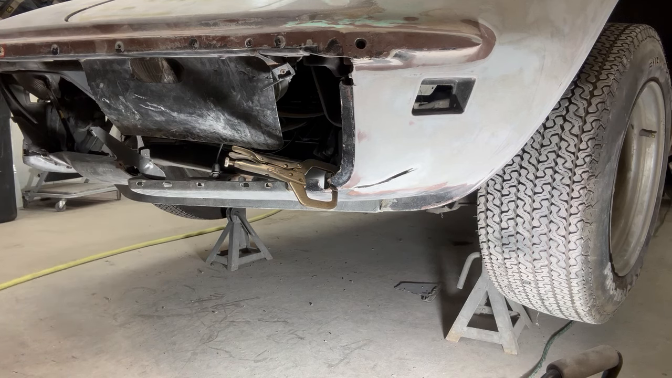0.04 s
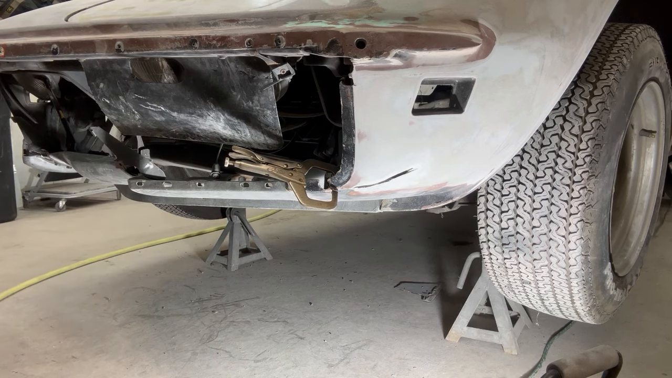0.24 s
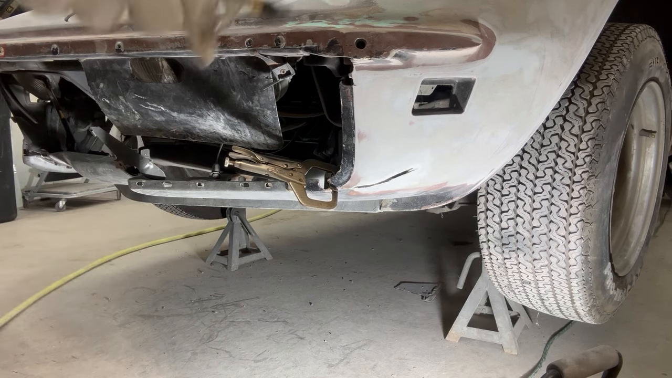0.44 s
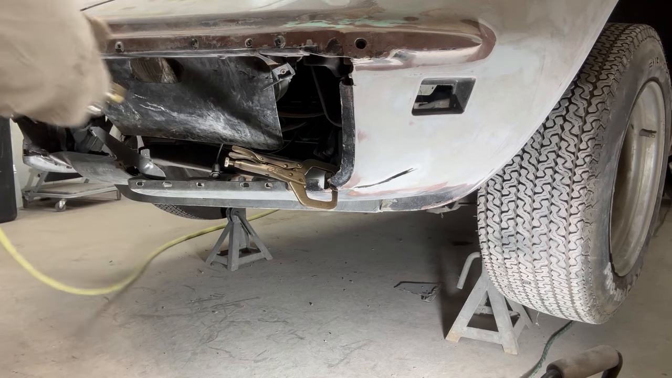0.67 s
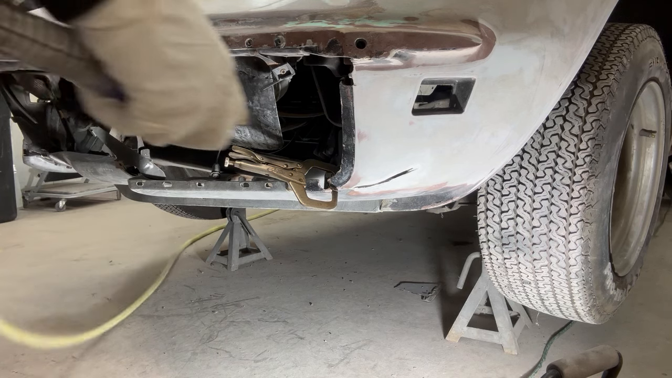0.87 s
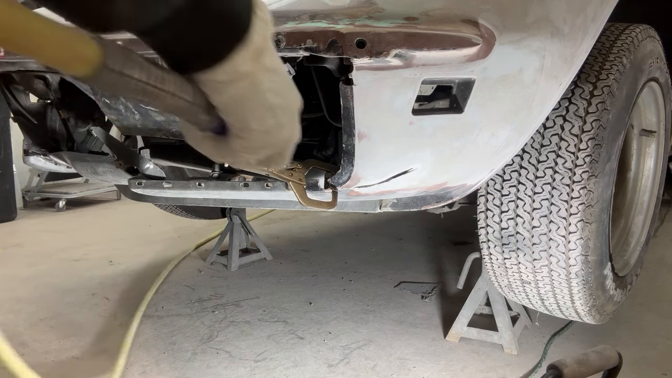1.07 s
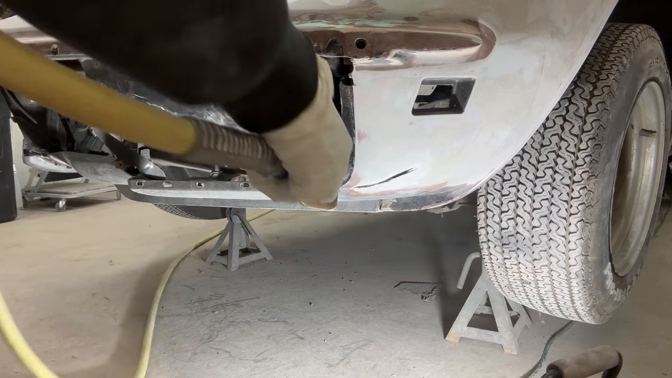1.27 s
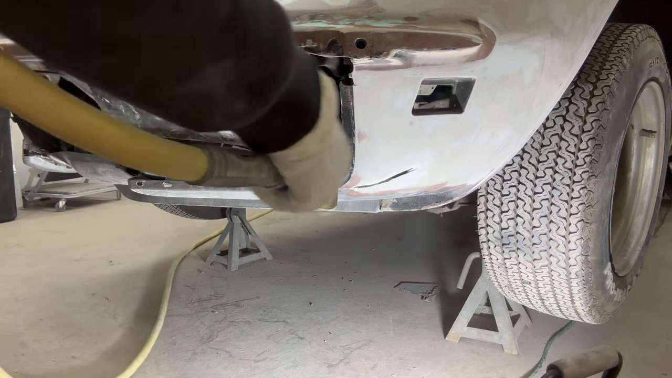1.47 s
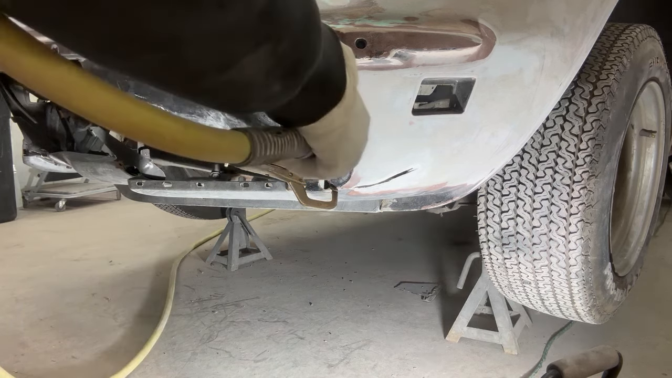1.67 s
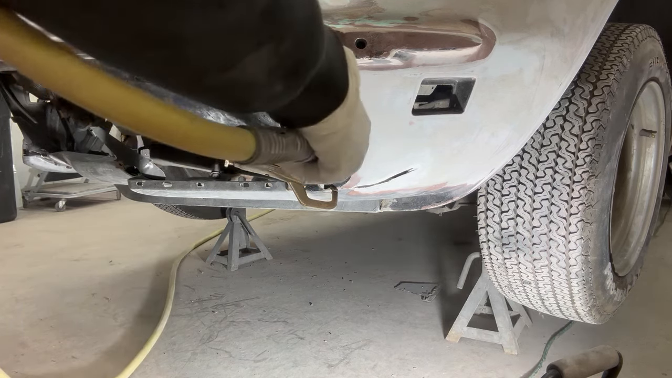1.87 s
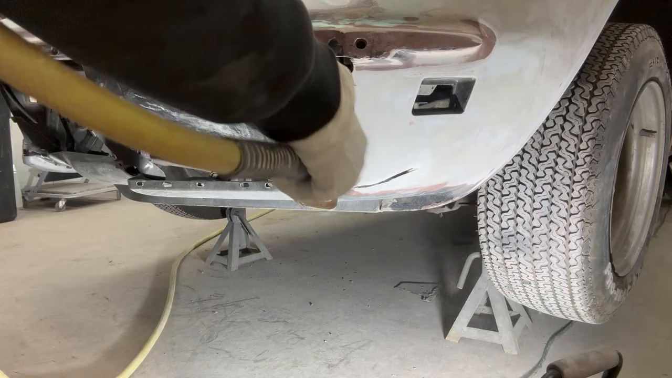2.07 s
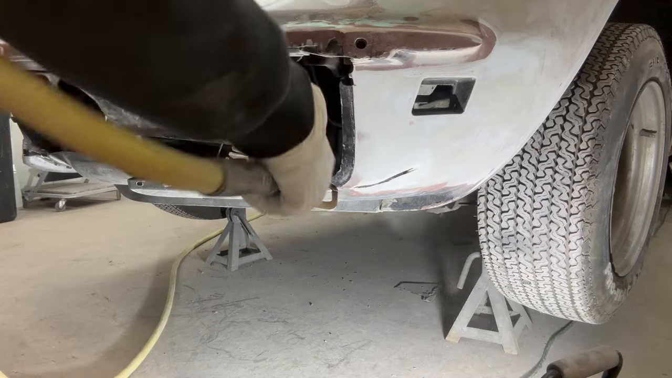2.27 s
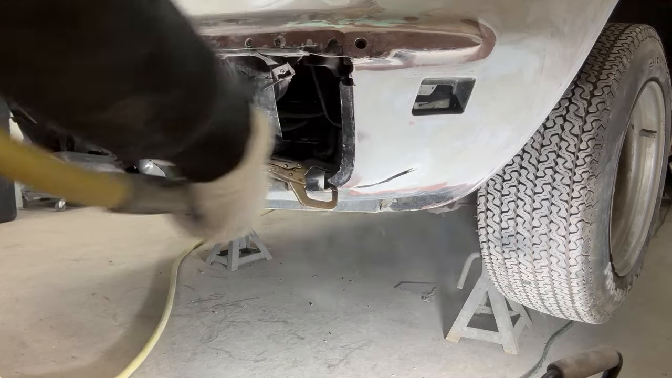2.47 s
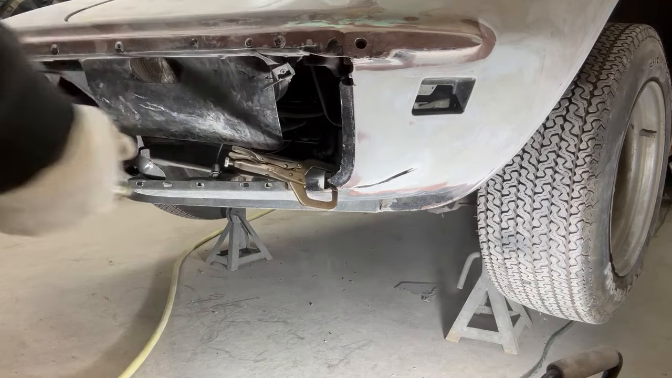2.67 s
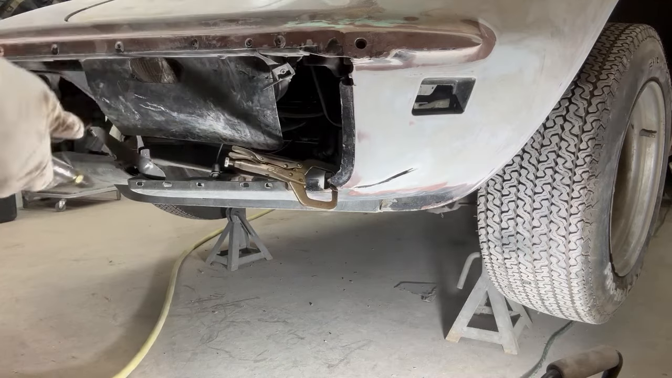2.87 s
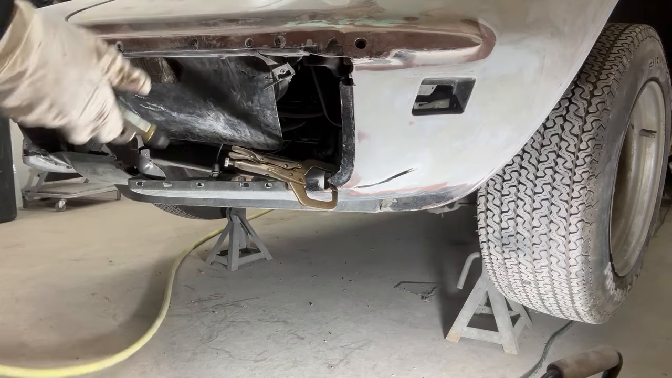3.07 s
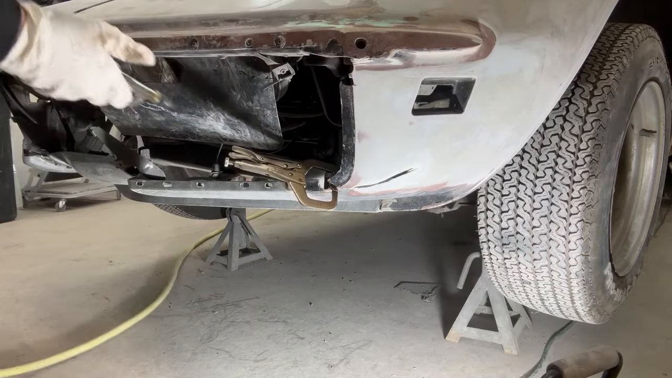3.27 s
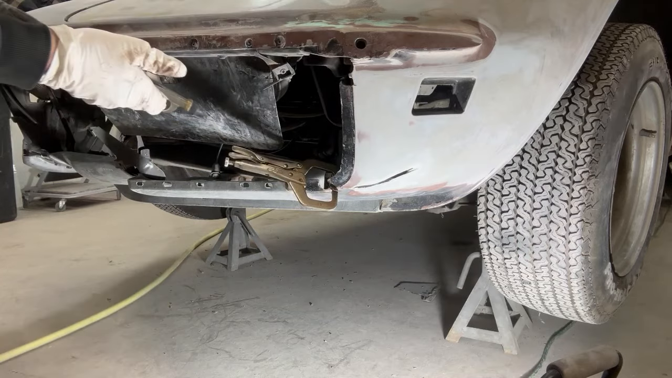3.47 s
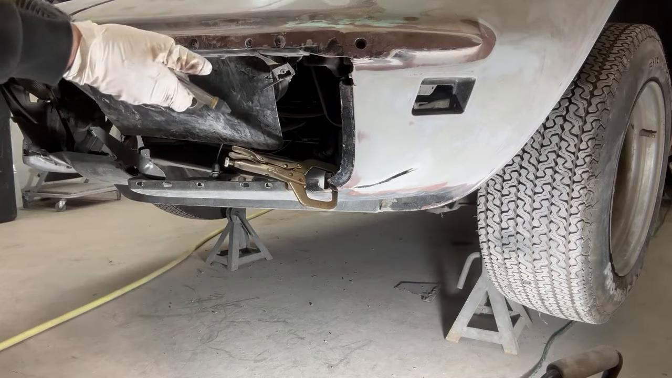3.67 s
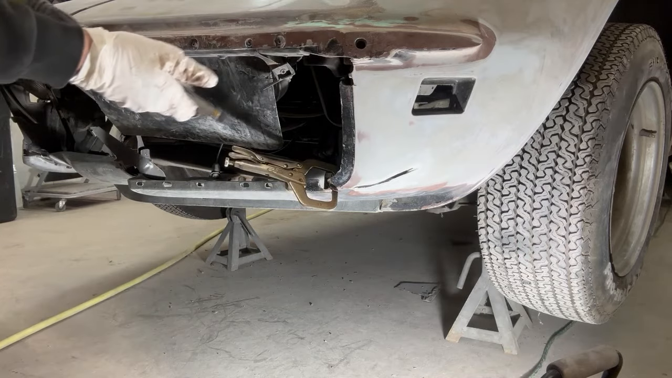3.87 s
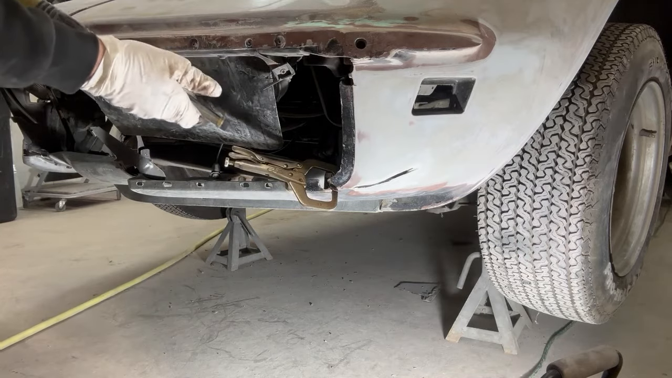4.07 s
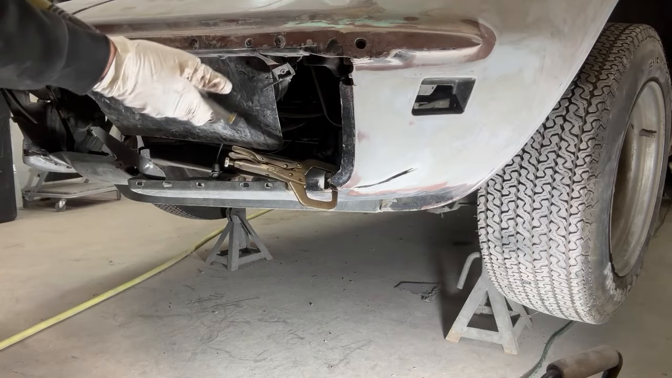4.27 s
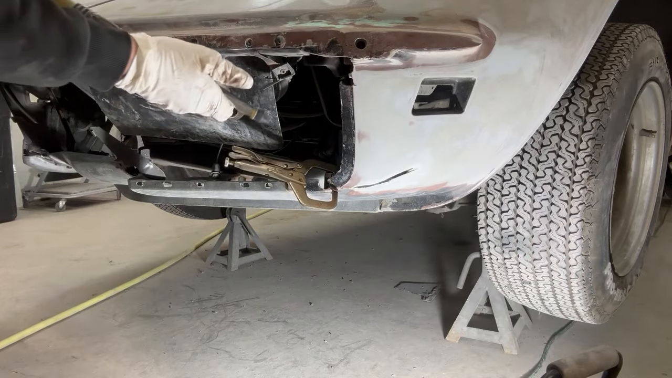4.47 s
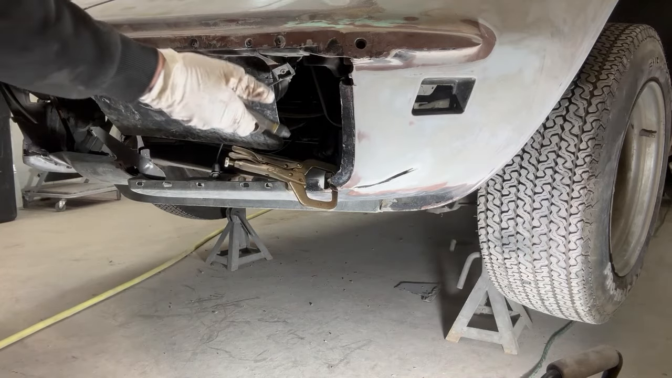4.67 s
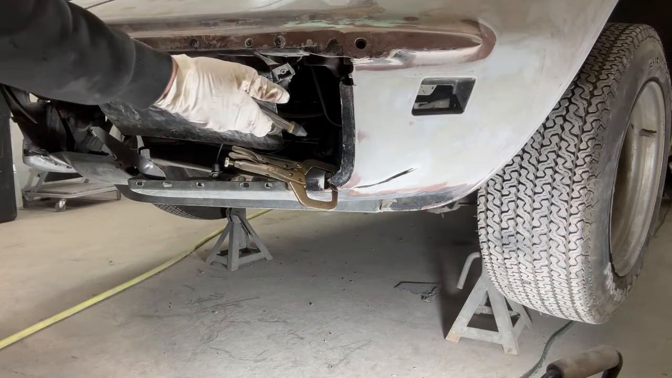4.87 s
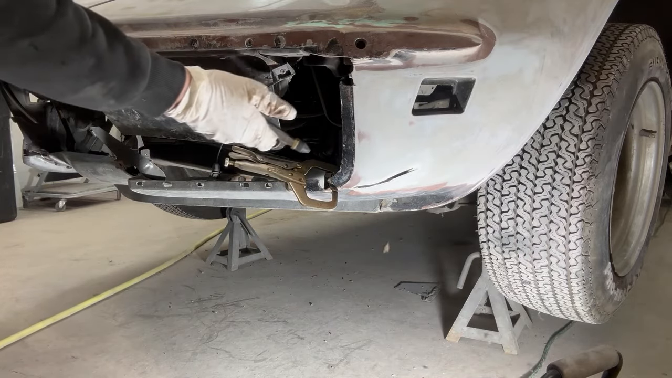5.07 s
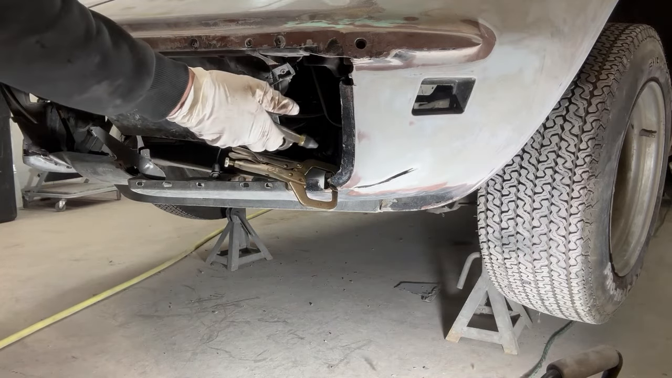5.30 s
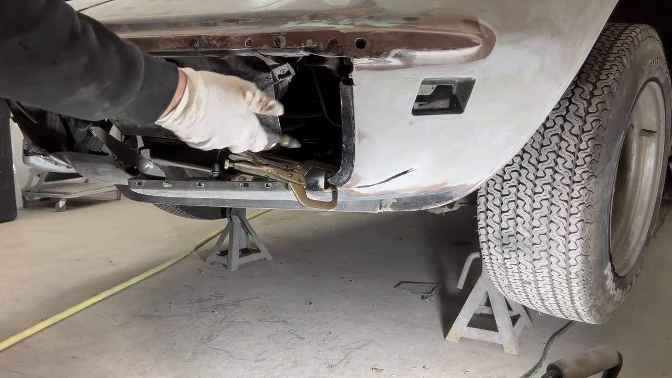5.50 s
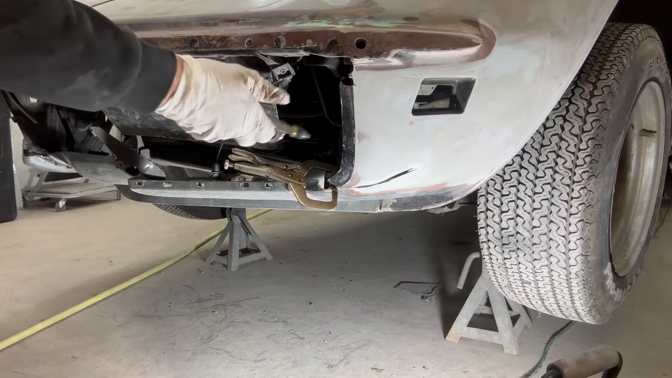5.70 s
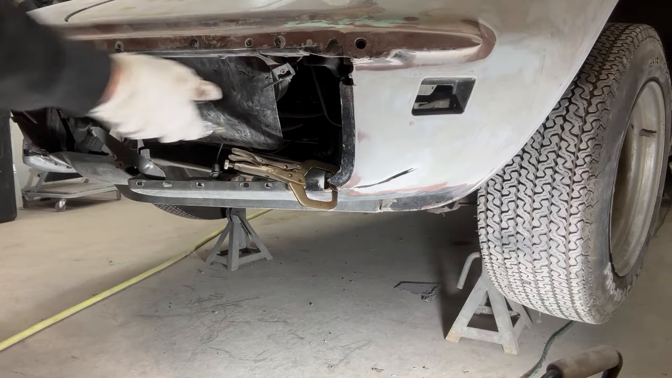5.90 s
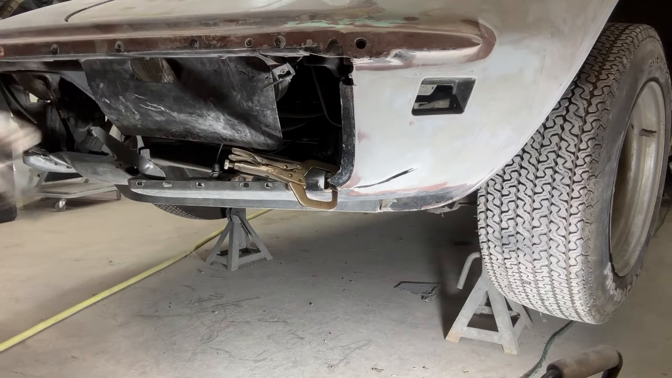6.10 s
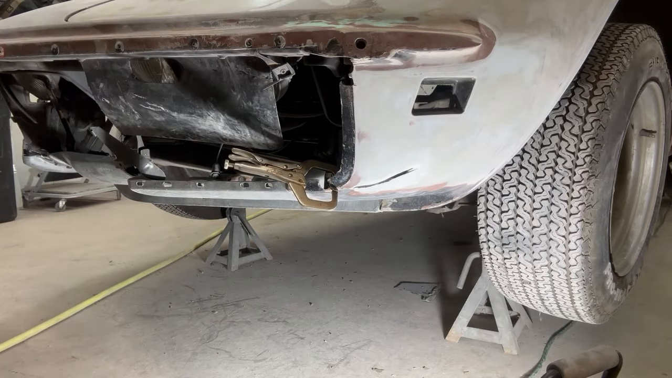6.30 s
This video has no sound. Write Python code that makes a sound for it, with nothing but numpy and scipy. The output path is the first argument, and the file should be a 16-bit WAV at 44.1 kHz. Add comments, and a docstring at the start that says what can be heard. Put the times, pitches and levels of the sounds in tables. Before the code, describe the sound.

At the start a rubber air hose drags with a soft gritty scuff over a concrete floor, then bumps it lightly several times until about 0.8 seconds, while air leaks faintly from a coupling. At 1.1 seconds a blow gun opens abruptly, close to the microphone: a loud, bright hiss with a hollow roar from the metal panels of a car body and a slight low rumble. It shuts off at 2.5 seconds, leaving a short workshop echo. Quiet hose scuffs and a few soft knocks follow from 2.7 to 3.8 seconds, with a very faint seep of air. At 3.9 seconds a second loud blast begins, its roar shifting between deep and metallic as the jet moves. From about 5.3 seconds it flutters in sharp hissing surges across metal edges. It stops at 5.9 seconds and the echo fades into faint room noise.

```python
"""An air blow gun blasts twice into the open nose of a car body in a workshop, close to a phone.
The nozzle hisses; the jet roars in the hollow panels and tears on their edges; the shop rings on.
Before and between the blasts the rubber hose scuffs and knocks on the concrete,
and air leaks faintly at the coupling and past the valve."""
import sys
import numpy as np
from scipy import signal
from scipy.fft import rfft, irfft, next_fast_len
from scipy.io import wavfile
from scipy.ndimage import uniform_filter1d, map_coordinates

SR = 44100
rng = np.random.default_rng(int(sys.argv[2]) if len(sys.argv) > 2 else 0)


def digitize_waveform(pressure):
    """Quantize a signal to 16-bit integers and store it at the path in sys.argv[1].

    Rows of a 2-D input are taken as channels; values are limited to [-1, 1].
    """
    field = np.atleast_2d(pressure).T
    bounded = np.clip(field, -1, 1)
    quanta = np.round(bounded * 32767).astype(np.int16)
    wavfile.write(sys.argv[1], SR, quanta)


N = 279814
TIME = np.arange(N) / SR
FFT_SIZE = next_fast_len(N + SR)
HZ = np.arange(FFT_SIZE // 2 + 1) * SR / FFT_SIZE + 1e-3

# trigger valve, per blast: (open [s], shut [s], rise [s], fall [s])
VALVE = [(1.12, 2.474, .021, .033), (3.889, 5.915, 0.0066, 0.022)]
# jet aim, a curve per blast: (time [s], jet level [dB], deep roar drive [dB], metal roar drive [dB])
JET_AIM = [
    [(1.134, -14, -29, -18), (1.142, -14.5, -10, -7), (1.17, -15.5, -4, -6), (1.5, -16.5, -5.5, -4.5),
     (1.6, -16.5, -8.5, -12), (1.78, -17.5, -6.5, -12.5), (1.86, -18, -3, -11), (2.08, -19.5, -1.5, -3.5),
     (2.27, -19, -9, -10.5), (2.445, -21, -8, -6)],
    [(3.89, -63.5, -25, -19.5), (3.93, -29, -24, -23.5), (3.96, -27.5, -4, -10), (4.17, -26, -9.5, -15.5),
     (4.22, -17.5, -6, -14.5), (4.27, -16.5, -3.5, -2), (4.5, -21, -2.5, -3.5), (4.65, -21.5, -7.5, -9.5),
     (4.74, -19.5, -11, 0.5), (4.94, -19.5, -11.5, -2.5), (5.0, -24, -10.5, -4), (5.06, -14.5, -23.5, -6.5),
     (5.21, -22, -13, 0), (5.28, -27, -8, -2.5), (5.45, -24, -16, -12.5), (5.66, -27.5, -9.5, -10),
     (5.9, -29, -9.5, -13.5)],
]
# jet crosses a rib or lip: (time [s], hiss lift [dB], roar lift [dB], half width [s])
RIB_CROSSINGS = [(1.45, 0, 2.5, .02), (1.52, -2, 3.5, 0.02), (1.635, -0.5, 6, 0.022),
                 (1.825, -2.5, 4, 0.024), (2.225, -2, 5, .015), (2.306, -2, 7, .015), (4.0, 0, 2, 0.021),
                 (4.13, 2.5, 7, 0.039), (4.39, -1, 3.5, 0.022), (4.485, 0.5, 7, 0.027),
                 (4.583, 2.5, 8.5, .025), (4.69, 1.5, 8, .02), (4.875, 5.5, -2, 0.018),
                 (4.934, 6, 0.5, 0.0098), (5.314, 10, 3.5, 0.022), (5.366, 8, 4, 0.02),
                 (5.489, 7, -1.5, 0.013), (5.565, 10, 9, 0.019), (5.611, 8.5, 7.5, 0.025),
                 (5.724, 12.5, 8, .012), (5.792, 10.5, 9.5, .012), (5.877, 9, 6.5, 0.015)]


def air_gun():
    """The valve gates a jet whose hiss and roar follow what it hits. One stereo pair per blast."""
    times_s, *curves = np.vstack(JET_AIM).T
    jet_db, deep_db, metal_db = [np.interp(TIME, times_s, curve) for curve in curves]
    hiss_lift_db = sum(db * bump(s, width, width) for s, db, _, width in RIB_CROSSINGS)
    roar_lift_db = sum(db * bump(s, width, width) for s, _, db, width in RIB_CROSSINGS)
    roar = body_roar([deep_db, metal_db, hiss_lift_db, roar_lift_db])
    return [gate(*valve) ** 2 * (undb(jet_db) * (hiss + roar) + buffet)
            for valve, buffet, hiss in zip(VALVE, buffeting(), nozzle_hiss(hiss_lift_db))]


# nozzle deep in the hollow, then at its mouth: (frequency [Hz], level [dB])
NOZZLE_SPECTRA = [
    [(3500, -25), (5500, -3.5), (7500, -2), (9500, -2.5), (12000, -3), (14000, -0.5), (15600, -4),
     (17000, -10.5)],
    [(3500, -21), (5500, 0.5), (7500, 5), (9500, 2), (12000, -1), (14000, 3), (15600, 0.5), (17000, -17)],
]


def nozzle_hiss(lift_db):
    """Gusty treble hiss of the jet, one colour per blast."""
    return [undb(lift_db) * noise(spectrum(hiss), gust_db=1.5, gust_hz=43) for hiss in NOZZLE_SPECTRA]


# resonances: (frequency [Hz], width [Hz], level [dB])
HOLLOW_MODES = [(267, 24, -13), (385, 35, -6.5), (473, 36, -5.5), (574.6, 37.3, 0.5), (699, 45, -7)]  # deep air modes
PANEL_MODES = [(896, 50, -1), (1043, 29, -2), (1127, 59, -2), (1234, 11, 1), (1324, 46, -4.5)]
EDGE_MODES = [(1651, 73, -1.5), (1674, 35, -8), (1792, 45, -5.5), (2200, 40, -3), (2300, 40, -6)]  # sheet-metal lips
RASP_MODES = [(2737, 28, 2.5), (3256, 39, -0.5), (3440, 41, -6), (3530, 40, -1), (3840, 36, -3)]  # small brackets
# wash between the modes: (frequency [Hz], level [dB])
HOLLOW_WASH = [(150, -37), (300, -22), (600, -13), (800, -17), (1100, -31)]
PANEL_WASH = [(550, -35.5), (800, -11.5), (1100, -11.5), (1450, -16.5), (2000, -28.5)]
EDGE_WASH = [(1100, -37.5), (1500, -6), (2000, -9), (2500, -8.5), (3200, -23.5)]
RASP_WASH = [(2000, -31.5), (2700, -9.5), (4000, -3.5), (5500, -6), (8000, -25.5)]
# per part: (blast 1 [dB], blast 2 [dB], weights [1] of deep, metal, hiss lift, roar lift, wander [dB])
ROAR_MIX = {"hollow": (0, -1, 1., 0., 0.5, 0.39, 2), "panel": (0.39, -0.6, 0.46, 0.48, 0.09, 0.87, 1.3),
            "edge": (0.89, 1.4, 0.087, 1.01, 0.18, 1.17, 1.3),
            "rasp": (-2.3, -0.77, -0.12, 0.8, 0.66, 0.62, 0.58)}


def body_roar(drives_db):
    """The jet excites cavity and sheet-metal modes; the moving hand detunes them."""
    first_blast = TIME < VALVE[1][0]

    def part(name, modes, wash, gust_db, gust_hz=60):
        first_db, second_db, *weights, wander_db = ROAR_MIX[name]
        level_db = np.where(first_blast, first_db, second_db) + np.dot(weights, drives_db)
        level_db += wander_db * wander(rate_hz=14)
        return undb(level_db) * noise(resonances(modes, wash), gust_db, gust_hz)

    hollow = part("hollow", HOLLOW_MODES, HOLLOW_WASH, gust_db=1)
    metal = part("panel", PANEL_MODES, PANEL_WASH, gust_db=1.5)
    metal += part("edge", EDGE_MODES, EDGE_WASH, gust_db=1.6)
    metal += part("rasp", RASP_MODES, RASP_WASH, gust_db=1.5, gust_hz=53)
    bounce_db = np.where(first_blast, -16, -9)  # off the nearest panel
    bounce = undb(bounce_db) * delay(metal, lag_s=0.001805 + 0.00019 * wander(rate_hz=5))
    return delay(hollow + metal + bounce, lag_s=0.0025 * wander(rate_hz=5))


# air rumble: (frequency [Hz], level [dB])
BUFFET_SPECTRUM = [(20, -42.5), (40, -21.5), (65, -5.5), (130, 0), (250, 0.5), (400, -27)]
# rumble per blast: (start [s], rise [s], first level [dB], last level [dB])
BUFFETS = [(1.132, .012, -32.5, -43.5), (3.91, 0.039, -45.5, -50.5)]


def buffeting():
    """Low gusts that ease off over each blast."""
    rumble = noise(spectrum(BUFFET_SPECTRUM), gust_db=2.5, gust_hz=14)
    return [gate(start, 9, rise, 1) * ramp(start, shut, first_db, last_db) * rumble
            for (start, rise, first_db, last_db), (_, shut, _, _) in zip(BUFFETS, VALVE)]


# rubber on concrete: (frequency [Hz], level [dB])
BRIGHT_SCUFF = [(530, -49.5), (900, -19.5), (2290, -7), (3280, -7.5), (4520, -13.5), (5750, -1),
                (8950, -2.5), (12700, -3), (15700, -4)]
DULL_SCUFF = [(530, -36), (900, -7.5), (1720, 0.5), (2490, -6.5), (3400, -6), (6250, -15.5), (7390, -22),
              (14300, -16.5), (15700, -16.5)]
LOW_RUB = [(30, -25.5), (70, -2), (160, -11.5), (450, -10), (900, -14), (1500, -16.5)]
# grains snapping under the hose: (time [s], level [dB])
GRIT = [(0.602, -45.5), (0.645, -48)]
# later strokes: (time [s], level [dB], swell [s], fade [s])
STROKES = [(2.73, -49, 0.08, 0.04), (2.95, -63.5, .016, 0.018), (3.235, -45.5, 0.048, 0.019),
           (3.385, -55, .03, .03), (3.45, -47, 0.042, .03)]
# rubbing: (start [s], end [s], first level [dB], last level [dB])
SLIDES = [(-.1, 1.1, -44.5, -58.5), (3.155, 3.82, -53.5, -70.5)]


def hose_drags():
    """The hose slides on concrete: one bright gritty drag, duller strokes later, a low rub."""
    drag = gate(0, 0.285, 0.05, 0.035) * ramp(0, 0.285, first_db=-39, last_db=-35.5)
    grit = sum(undb(db) * bump(s, 0.0012, 0.0012) for s, db in GRIT)
    strokes = sum(undb(db) * bump(s, swell, fade) for s, db, swell, fade in STROKES)
    creep = undb(-65) * gate(3.151, 3.82, 0.0038, 0.3)
    sliding = sum(gate(start, end, 0.004, 0.05) * ramp(start, end, *db) for start, end, *db in SLIDES)
    bright = (drag + grit) * noise(spectrum(BRIGHT_SCUFF), gust_db=1.5, gust_hz=92)
    dull = (strokes + creep) * noise(spectrum(DULL_SCUFF), gust_db=1, gust_hz=50)
    rub = sliding * noise(spectrum(LOW_RUB), gust_db=2.7, gust_hz=67)
    return bright + dull + rub


# hose hits the floor: (time [s], level [dB], settled pitch [Hz], t60 [s], tick [dB re level])
KNOCKS = [(.252, -31, 160, 0.046, -29), (0.298, -41, 89, 0.2, -26), (.365, -40, 147, 0.15, -19),
          (.396, -30, 176, 0.088, -11), (0.515, -44.5, 180, 0.031, -24), (.692, -34.5, 133, 0.15, -17.5),
          (.749, -42, 145, 0.037, -16), (.793, -30.5, 230, 0.05, -3.5), (.8205, -27.5, 270, 0.046, -9),
          (3.152, -45.5, 365, 0.046, -10), (3.278, -41.5, 124, 0.08, -22), (3.732, -56.5, 300, 0.03, 1.5)]


def hose_knocks():
    """Bending waves bring the highs first, so pitch falls; contacts tick, the floor scatters dully."""
    track, t = np.zeros(N + SR), np.arange(SR // 5) / SR
    floor_band = signal.butter(2, [70, 600], "band", fs=SR, output="sos")
    scatters = signal.sosfilt(floor_band, rng.standard_normal((len(KNOCKS), len(t))))
    tick_hz = 1150 + 1000 * np.exp(-t / 0.0032)
    attack = 1 - np.exp(-t / 0.00073)
    for (s, db, settled_hz, t60, tick_db), scatter in zip(KNOCKS, scatters / scatters.std()):
        ring_hz = settled_hz * (1 + 2.4 * np.exp(-t / 0.0035))
        ring = np.sin(2 * np.pi * np.cumsum(ring_hz) / SR) * undb(-60 * t / t60)
        tick = np.sin(2 * np.pi * np.cumsum(tick_hz) / SR) * undb(tick_db - 60 * t / 0.037)
        floor = scatter * undb(-12.5 - 60 * t / 0.15)
        start = int(s * SR)
        track[start:start + len(t)] += undb(db) * (ring + tick + floor) * attack
    return np.array([track[:N], np.roll(track[:N], int(0.003 * SR))])


# escaping air: (frequency [Hz], level [dB])
COUPLING_LEAK = [(500, -17.5), (1000, -6.5), (2500, -2.5), (4500, -6), (6000, -5), (8000, -2.5),
                 (11000, -12.5), (16500, -14.5)]
VALVE_SEEP = [(4000, -32), (8000, -12.5), (10500, -5), (12500, -1.5), (14500, -2), (16500, -1.5)]


def air_leaks():
    """The coupling leaks before the first blast; air seeps past the valve before both."""
    before_first, before_second = gate(0.25, 1.14, 0.05, 0.01), gate(3.42, 3.95, 0.1, 0.01)
    leak = undb(-54) * before_first * noise(spectrum(COUPLING_LEAK), gust_db=2.5, gust_hz=41)
    seep_gain = undb(-57) * before_first + undb(-66.5) * before_second
    return leak + seep_gain * noise(spectrum(VALVE_SEEP), gust_db=0.5, gust_hz=12)


# workshop reverberation: (band centre [Hz], t60 [s], level [dB])
ECHO_BANDS = [(60, 1.3, 0), (140, 1.0, -1), (300, 1.2, 3.5), (660, 1.01, 1.5), (1290, 0.93, -2),
              (2680, 0.76, -0.5), (5030, .55, -3), (9000, 0.52, -2), (14000, .42, 0)]


def shop_echo(source):
    """Diffuse tail: noise bands about an octave wide, each fading at its own rate."""
    t, tail = TIME[:SR], 0
    onset = np.clip(t / 0.027, 0, 1)
    log_centres = np.log([row[0] for row in ECHO_BANDS])
    for k, (_, t60, db) in enumerate(ECHO_BANDS):
        response = np.interp(np.log(HZ), log_centres, np.arange(len(ECHO_BANDS)) == k) ** 0.5
        band = filtered(rng.standard_normal((2, SR)), response)[:, :SR]
        tail += band * onset * undb(db - 60 * t / t60) / np.sqrt(SR * t60)
    return undb(2.5) * filtered(source, rfft(tail, FFT_SIZE))


# workshop background: (frequency [Hz], level [dB])
SHOP_SPECTRUM = [(20, -15.5), (50, 2), (150, -4), (500, -13), (2000, -11.5), (4000, -15), (8000, -9.5),
                 (12500, -17.5), (16500, -16.5)]


def shop_tone():
    """Faint steady room noise."""
    return undb(-70.5) * noise(spectrum(SHOP_SPECTRUM))


def undb(db):
    return 10 ** (np.asarray(db) / 20)


def over_hz(table):
    """A (frequency, value) table on the FFT grid."""
    hz, value = np.transpose(table)
    return np.interp(np.log(HZ), np.log(hz), value)


def spectrum(table):
    return undb(over_hz(table))


def resonances(modes, wash):
    """Modes of alternating sign, added in power to a broad wash."""
    peaks = sum((-1) ** k * undb(db) / (1 + 1j * (HZ - hz * hz / HZ) / width)
                for k, (hz, width, db) in enumerate(modes))
    return np.hypot(np.abs(peaks), spectrum(wash))


def filtered(x, response):
    return irfft(rfft(x, FFT_SIZE) * response, FFT_SIZE)[..., :N]


def wander(rate_hz):
    """Random steps, smoothed twice; standard deviation 1."""
    hold = int(SR / rate_hz)
    steps = np.repeat(rng.standard_normal(N // hold + 1), hold)
    smooth = uniform_filter1d(uniform_filter1d(steps, hold), hold)[:N]
    return smooth / smooth.std()


def noise(response, gust_db=0, gust_hz=40):
    """Two independent noises of one colour with shared gusts; rms 1."""
    pair = filtered(rng.standard_normal((2, N)) * undb(gust_db * wander(gust_hz)), response)
    return pair / pair.std()


def gate(start_s, end_s, rise_s, fall_s):
    return np.clip(np.minimum((TIME - start_s) / rise_s, (end_s - TIME) / fall_s), 0, 1)


def bump(peak_s, swell_s, fade_s):
    return np.exp(-((TIME - peak_s) / np.where(TIME < peak_s, swell_s, fade_s)) ** 2)


def ramp(start_s, end_s, first_db, last_db):
    return undb(np.interp(TIME, [start_s, end_s], [first_db, last_db]))


def delay(pair, lag_s):
    return np.array([map_coordinates(x, [(TIME - lag_s) * SR], order=1, mode="mirror") for x in pair])


# left-right likeness of the sound: (frequency [Hz], coherence [1])
STEREO_COHERENCE = [(60, 0.96), (130, 0.94), (220, .88), (330, .7), (700, 0.68), (1500, .92), (2500, .84),
                    (4000, .68), (6000, 0.29), (7300, 0.81), (11500, 0.87), (12500, .86), (13100, 1)]
# balance: (frequency [Hz], left minus right [dB])
STEREO_TILT = [(150, 0), (300, -1.8), (800, -.8), (2200, 1.5), (4500, 0), (5500, 1.5), (7000, 5.5),
               (8500, 3.5), (10000, .5), (13100, 0)]
# treble phase between channels: (frequency [Hz], left lead [rad])
TREBLE_PHASE = [(7000, -3.0), (8500, -2.4), (10000, -1.7), (12000, -.8), (12500, -.4), (13100, 0)]


def stereo_image(pair, lead_s, pan_db, scatter):
    """The lows keep the source's direction, the treble has a set phase; the highest hiss is mono."""
    crossover_hz = (5800, 7000)
    low = np.interp(HZ, crossover_hz, [1, 0])
    coherence = np.clip(over_hz(STEREO_COHERENCE), 0, 1) ** (1 + low * (scatter - 1))
    arrival_rad = 2 * np.pi * HZ * lead_s
    turns = np.round(crossover_hz[1] * lead_s - TREBLE_PHASE[0][1] / (2 * np.pi))  # for a smooth join
    phase_rad = low * arrival_rad + (1 - low) * (over_hz(TREBLE_PHASE) + 2 * np.pi * turns)
    lean = undb((over_hz(STEREO_TILT) + low * pan_db) / 2)
    mid, side = rfft(pair, FFT_SIZE) * np.sqrt([(1 + coherence) / 2, (1 - coherence) / 2])
    left = (mid + side) * lean * np.exp(1j * phase_rad)
    right = (mid - side) / lean
    return irfft([left, right], FFT_SIZE)[:, :N]


# direction per blast: (left lead [s], left minus right [dB], scatter exponent [1])
BLAST_DIRECTIONS = [(-8e-5, -3.0, 1.5), (-6e-5, -2.5, 1.2)]


def scene():
    """Blasts, hose and workshop, each from its own direction."""
    blasts = air_gun()
    hose = hose_drags() + air_leaks() + hose_knocks()
    shop = shop_tone() + shop_echo(sum(blasts)[0] + hose[0])
    mix = sum(stereo_image(blast, *direction) for blast, direction in zip(blasts, BLAST_DIRECTIONS))
    mix += stereo_image(hose, lead_s=2.6e-4, pan_db=0, scatter=1)
    return mix + stereo_image(shop, lead_s=-2.1e-5, pan_db=-1.5, scatter=1.9)


def record(dry):
    """The phone rounds the loudest peaks and cuts the deepest bass and the top."""
    rounded = dry / (1 + np.abs(dry / 0.9) ** 4) ** 0.25
    highpass = signal.butter(2, 40, "high", fs=SR, output="sos")
    lowpass = signal.ellip(12, 0.2, 80, 15800, fs=SR, output="sos")
    return signal.sosfilt(lowpass, signal.sosfilt(highpass, rounded))


dry = scene()
out = record(dry)
digitize_waveform(out)
```